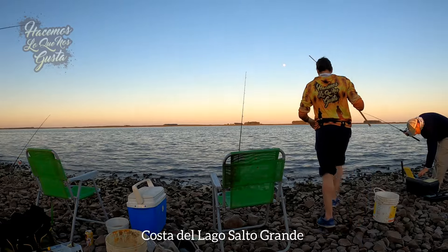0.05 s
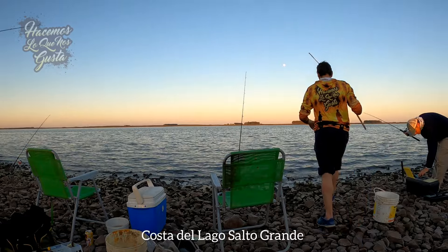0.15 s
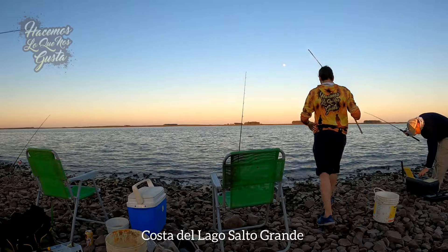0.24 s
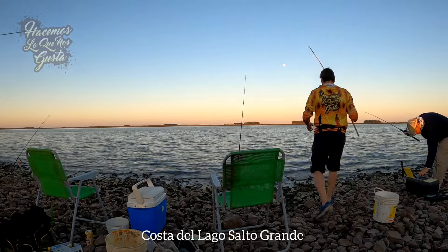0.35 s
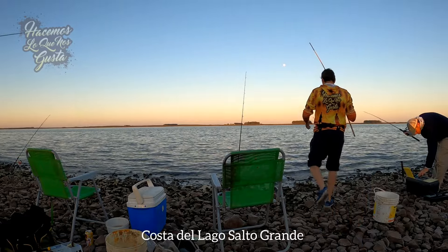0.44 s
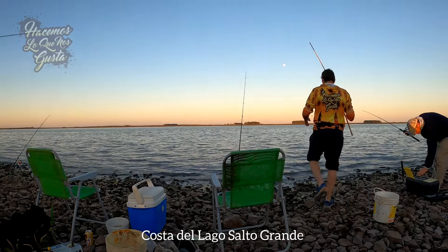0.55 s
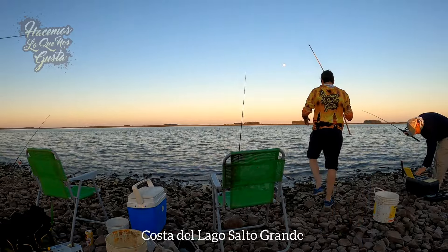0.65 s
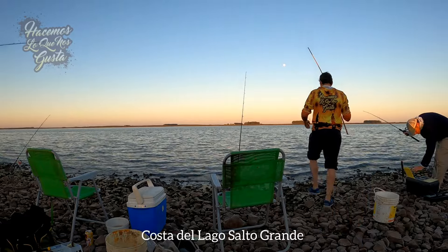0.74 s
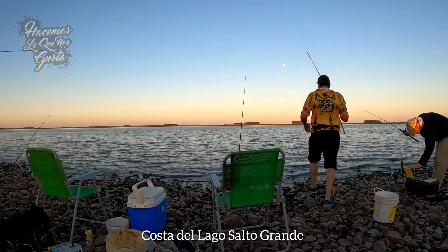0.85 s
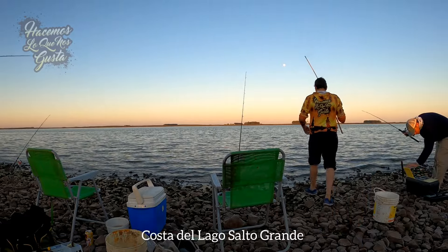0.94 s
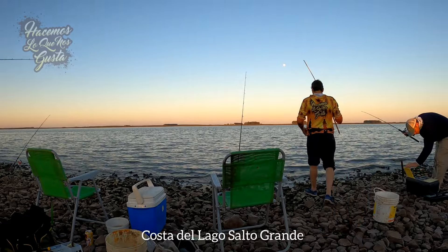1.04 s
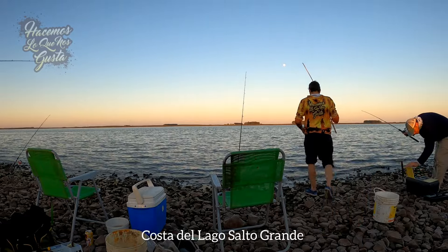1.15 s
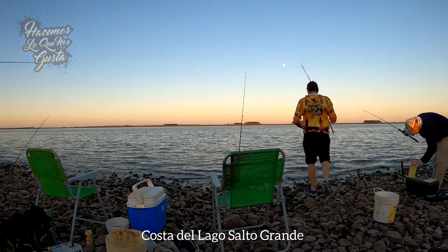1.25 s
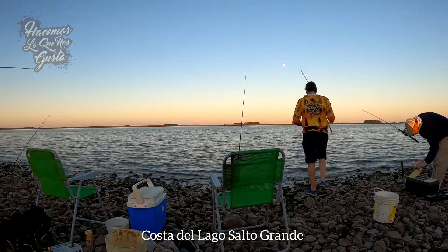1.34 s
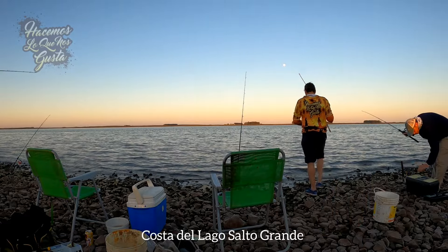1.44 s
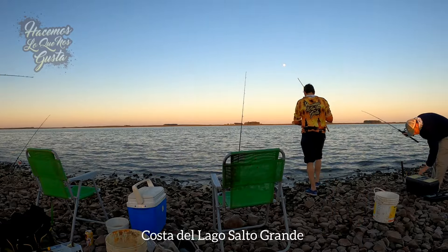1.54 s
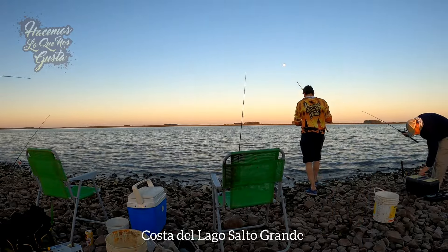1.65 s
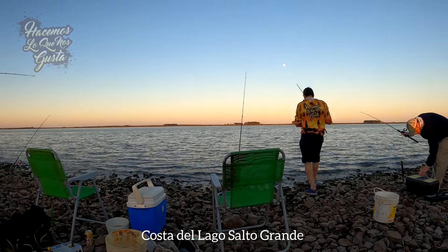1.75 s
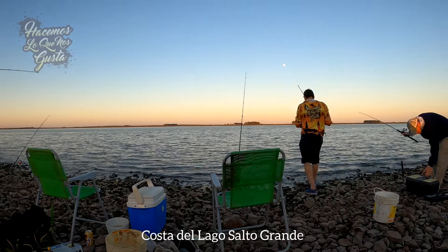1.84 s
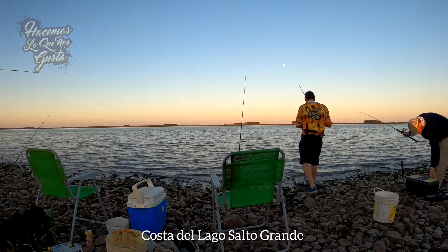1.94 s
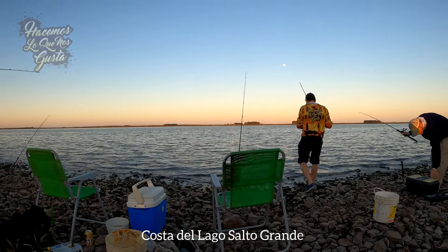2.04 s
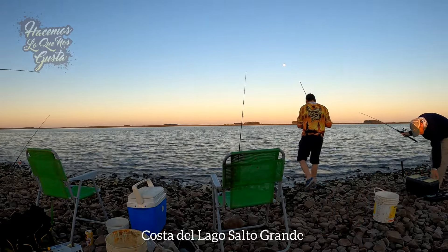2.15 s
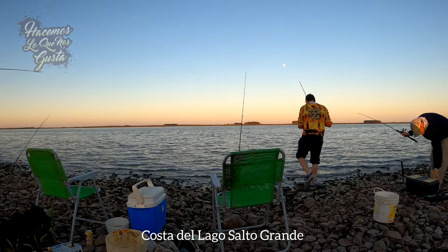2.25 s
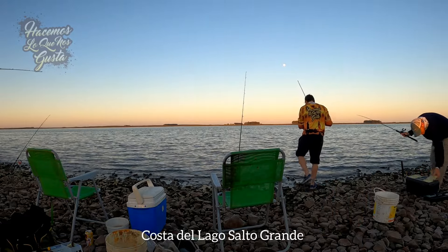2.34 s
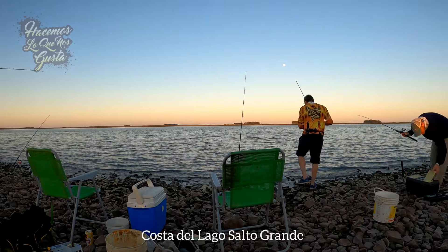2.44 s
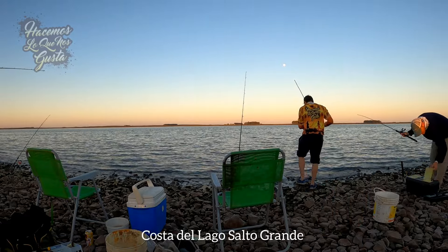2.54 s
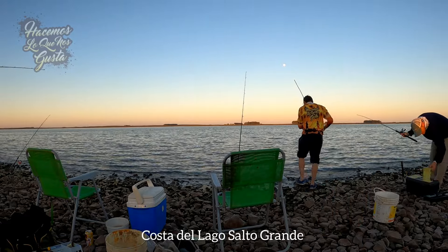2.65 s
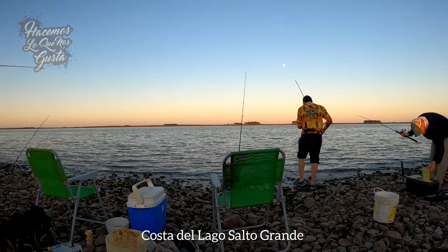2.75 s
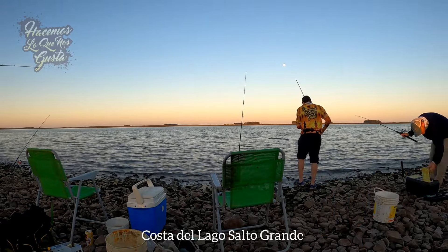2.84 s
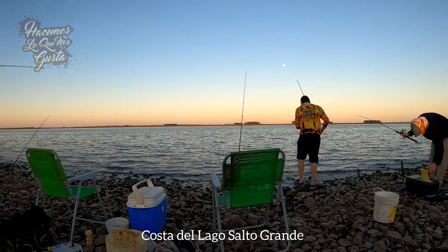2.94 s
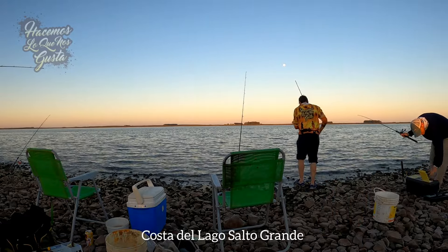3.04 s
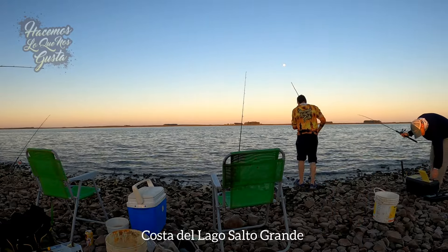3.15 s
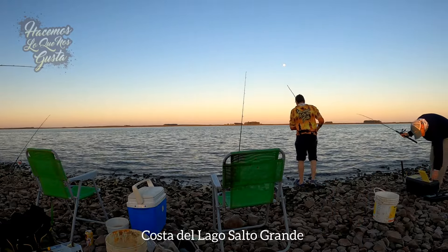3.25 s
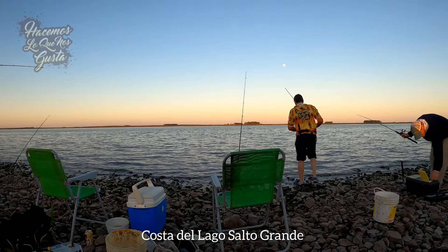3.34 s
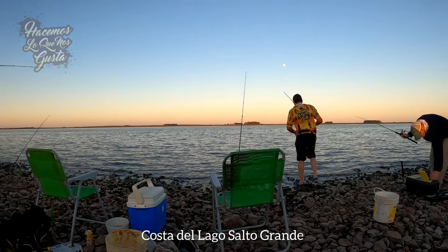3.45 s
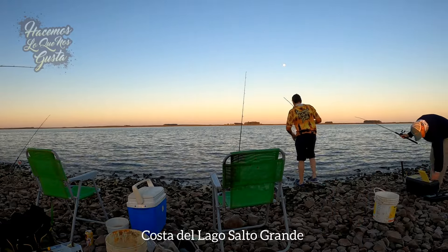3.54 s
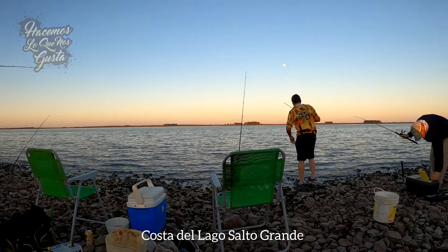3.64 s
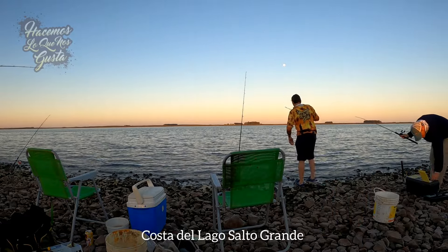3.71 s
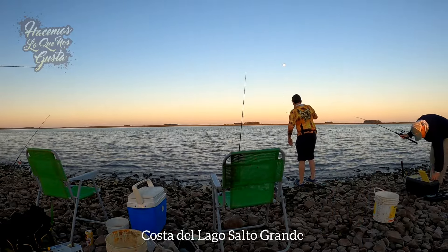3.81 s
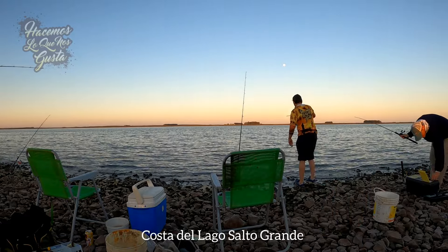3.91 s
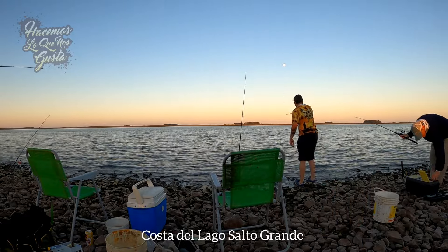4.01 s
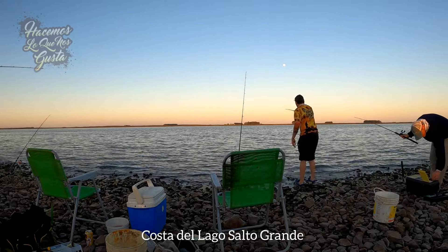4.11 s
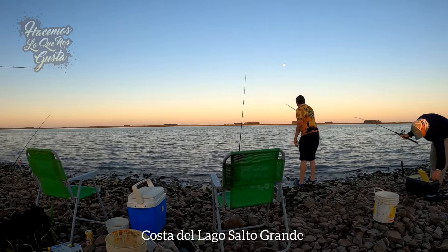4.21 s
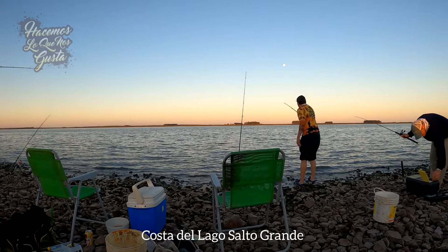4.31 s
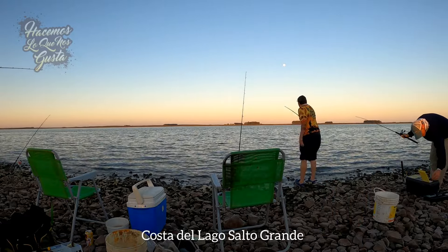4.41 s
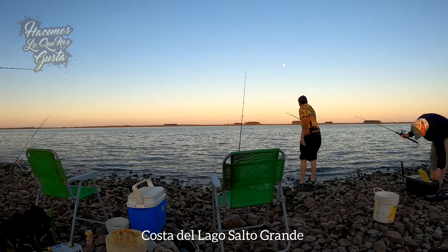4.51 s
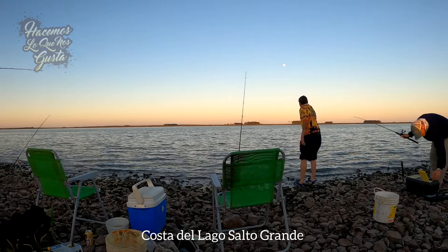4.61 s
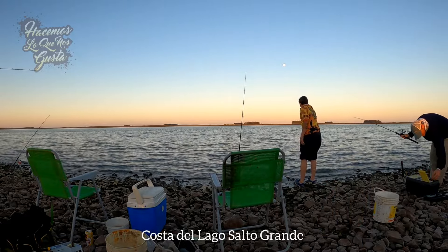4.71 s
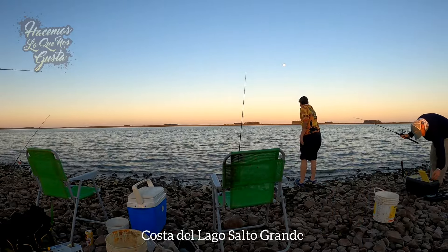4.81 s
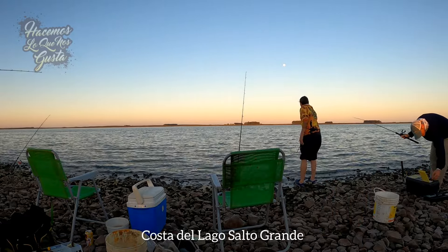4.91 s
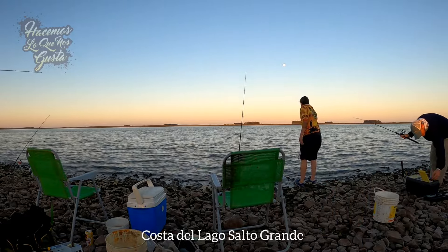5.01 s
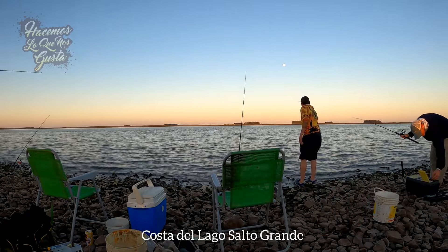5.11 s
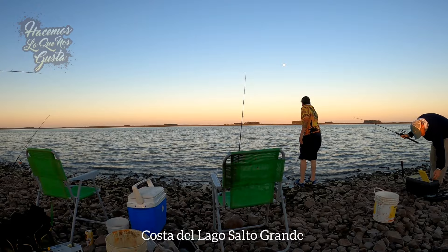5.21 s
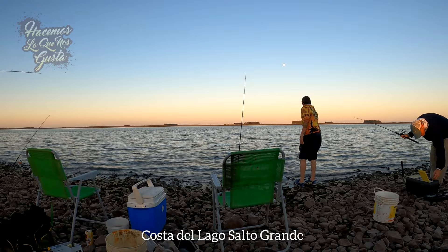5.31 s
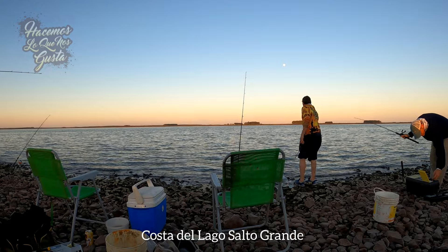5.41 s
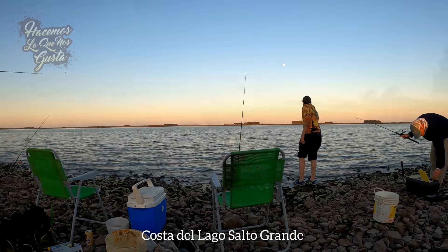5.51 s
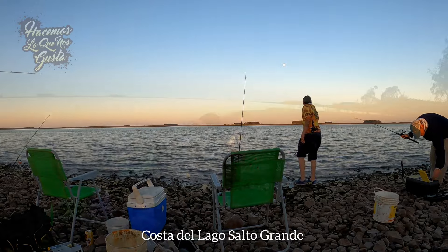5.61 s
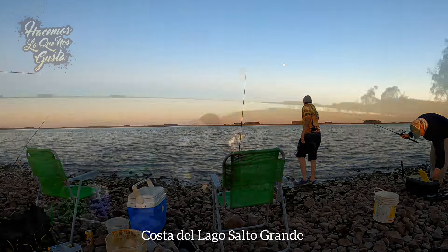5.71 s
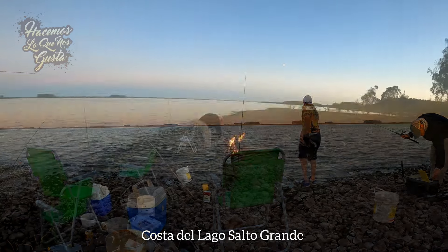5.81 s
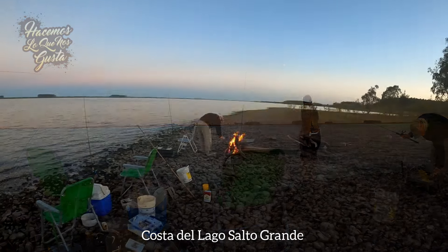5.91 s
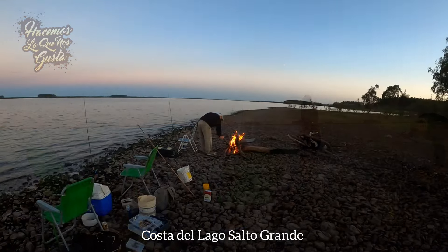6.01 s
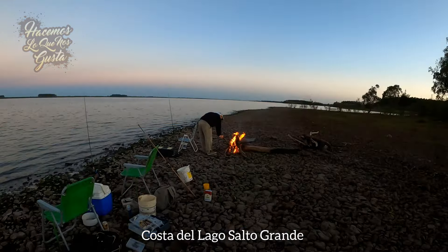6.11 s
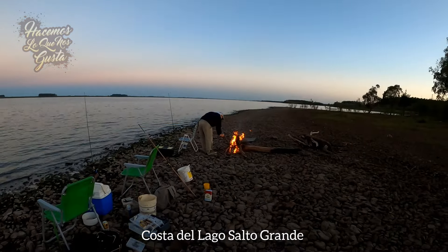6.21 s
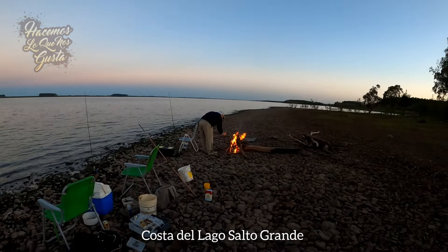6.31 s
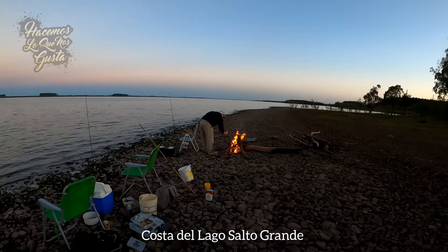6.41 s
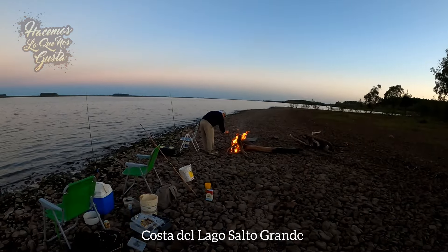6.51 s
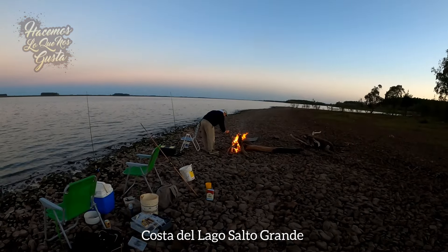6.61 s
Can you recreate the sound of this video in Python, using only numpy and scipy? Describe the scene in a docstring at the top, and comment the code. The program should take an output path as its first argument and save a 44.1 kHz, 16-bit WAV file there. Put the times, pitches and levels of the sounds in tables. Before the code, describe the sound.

Small waves lap and fizz over a pebbly lakeshore as wind rumbles, stones knock underfoot, and a crackling campfire rises at the end.

```python
"""Small waves lap a pebbly shore throughout: bubbles and hiss swell and drain, with drops, gulps and clicks.
A far bird whistles at once and again at 5.5 s, both gliding sines; early gusts rumble on two microphone ports.
A faint drone wavers from the start and sinks away by about 4 s. Rocking stones ring their modes from 0.3 s and
footfalls thud underfoot from 1.5 s; pops kick the ports at 1.2 and 2.5 s. From 5.4 s a campfire of noise and
ticks grows, with ringing firewood knocks, snaps and a last swell of sparks, just rising as the sound ends."""
import sys
import numpy as np
from scipy import signal
from scipy.fft import rfft, irfft, next_fast_len
from scipy.io import wavfile
from scipy.ndimage import uniform_filter1d, map_coordinates

SR = 44100
rng = np.random.default_rng(int(sys.argv[2]) if len(sys.argv) > 2 else 0)


def store_pcm(level_fs):
    """Save levels as 16-bit WAV."""
    pcm = np.round(np.clip(level_fs, -1, 1) * 32767).astype(np.int16)
    wavfile.write(sys.argv[1], SR, np.atleast_2d(pcm).T)


N = 293706
TIME = np.arange(N) / SR
RING = np.arange(SR // 4) / SR  # time axis of one short event, s

# In spectra, level/dB is the relative density per Hz.
# far background air: f/Hz, level/dB
AIR_SPECTRUM = [(25, 3), (120, -9), (210, -8), (300, -15), (600, -15), (3000, -21), (7000, -36),
                (12000, -55)]
# faint far drone: t/s, level/dB
DRONE_LEVEL = [(2.1, -68), (2.6, -73), (3.4, -69.5), (3.85, -70.5), (4.1, -82)]
# far bird, one table per whistle: t/s, f/Hz, level/dB
BIRD_WHISTLES = [
    [(0, 4830, -53), (.06, 4850, -51), (.095, 4910, -57), (.12, 5060, -61)],
    [(5.5, 2850, -64), (5.535, 3060, -55.5), (5.57, 2950, -59), (5.6, 2780, -61)],
]

# bed of flames, crackle and embers: t/s, level/dB
FIRE_LEVEL = [(5.4, -100), (5.65, -60), (6.1, -50), (6.66, -47.5)]
# flames and hiss: f/Hz, level/dB
FLAME_SPECTRUM = [(30, 9), (90, 28), (170, 25), (290, 9.5), (450, 4), (900, -30), (4000, -9), (5100, 3),
                  (5750, 2), (6400, -10), (9000, -17), (13000, -18), (15500, -38)]
# colour of the finest ticks: f/Hz, level/dB
SPARK_SPECTRUM = [(500, -20), (1800, -2), (5500, 0), (8000, -8), (10000, -22), (13000, -22), (15500, -38)]
# bursts of burning wood: t/s, level/dB, f/Hz, t60/s
FIRE_SNAPS = [(5.7837, -42, 4500, 0.03), (6.056, -41, 4230, 0.019), (6.1158, -34, 3000, 0.023),
              (6.2532, -33.5, 2250, 0.025), (6.3173, -36.5, 5470, 0.0073), (6.3647, -34, 7600, 0.0083),
              (6.409, -36, 5300, 0.031), (6.499, -30, 5070, 0.01), (6.538, -39, 5420, 0.049),
              (6.5913, -35, 5400, 0.011), (6.395, -39.5, 1000, .015)]
# last swell of sparks, just rising as the sound ends: t/s, swell width/s, level/dB
SPARK_FLARE = (6.7, 0.043, -47.5)
EMBERS_DB = -21  # ember ticks against the flames
# firewood knocks: t/s, level/dB, pitch ratio, brightness/(dB per octave), rattle/s, left-right/dB
LOG_KNOCKS = [(5.656, -32, 0.81, 5, 0.021, 3.5), (5.878, -42, 0.91, -16, 0.0072, 0),
              (5.8995, -31.5, 0.99, -12, 0.014, 4.5), (6.10, -41.5, 0.96, 8, 0.027, -1),
              (6.145, -35.5, 0.99, -20, 0.01, 2), (6.175, -41.5, 1, -16, 0.011, 4)]
# ring of a log, before the pitch ratio: f/Hz, level/dB, t60/s
LOG_RING = [(438, -6.5, 0.16), (563, 10, 0.097), (690, -12, 0.1), (1300, -6, 0.042)]

# gusts on the ports: t/s, relative level/dB, swell width/s, left-right/dB
WIND_GUSTS = [(0.247, -28, 0.14, -3), (0.47, -31.5, 0.2, -9.5), (0.886, -44, 0.39, 9),
              (0.993, -32.5, 0.13, 2.5), (1.433, -36.5, 0.052, 1.5), (1.608, -35, 0.14, 23),
              (1.803, -37.5, 0.12, -10), (2.133, -32.5, 0.15, 8.5), (2.404, -39.5, 0.08, 3),
              (2.653, -49, 0.34, -2.5), (2.935, -44, 0.12, 0), (3.644, -45, 0.26, -2),
              (3.812, -48.5, 0.38, -3), (4.098, -47.5, 0.18, 7), (4.606, -36.5, 0.29, -3.5),
              (5.535, -44, 0.14, 3), (6.335, -56, 1, -4)]
# large slow eddies: f/Hz, level/dB
RUMBLE_SPECTRUM = [(12, 1.5), (28, 7.5), (60, 7), (110, -6), (180, -34), (300, -33.5), (600, -87)]
# small fast eddies: f/Hz, level/dB
FLUTTER_SPECTRUM = [(60, -8), (120, 13), (190, 8.5), (300, -11.5), (500, -22), (1200, -82)]
# strong eddies, timed at their middle: t/s, level/dB, f/Hz, left-right/dB
EDDY_THUMPS = [(0.164, -21.5, 82, -18), (0.206, -25.5, 124, -18), (0.235, -27, 85, -18),
               (0.252, -15.5, 54, 27), (0.308, -26, 62.3, 9), (0.418, -18, 124, -35),
               (0.461, -23.5, 118, -39), (0.532, -25.5, 135, -24), (0.561, -25.5, 148, -35),
               (0.791, -21, 62.5, 23), (1.006, -14, 119, -35), (1.029, -15, 98, -30), (2.105, -19, 51, -35),
               (2.179, -30.5, 80.4, 33), (4.439, -28, 62, -32), (4.519, -25.5, 55.5, -8),
               (4.599, -20.5, 75, -28.5), (4.648, -26.5, 62.4, 12), (4.679, -24.5, 56, 22)]
BREEZE_DB = -72  # wind strength between gusts, on the scale of the gusts
# sharp pops at the microphone: t/s, level/dB, left-right/dB
MIC_POPS = [(1.208, -11.5, 4.5), (1.2205, -22, 0), (2.544, -16, 4.5)]
# swings after a pop, left port then right: f/Hz, level/dB, t60/s
POP_SWINGS = [
    [(38, -13, 0.036), (114, -8.5, 0.016), (570, -14.5, 0.0064), (2870, 7, 0.00021)],
    [(75, -5, 0.022), (206, -1.5, 0.011), (970, 2.5, 0.0021), (3170, -42, 0.00011)],
]

# big stones rocking: t/s, level/dB, pitch ratio, brightness/(dB per octave), rattle/s, left-right/dB
STONE_KNOCKS = [(.3348, -24, 1.15, -2.5, 0.0016, -0.5), (1.5035, -20, 1.045, 1.6, 0.0079, -1.5),
                (1.6636, -19.5, 1.01, -2.5, 0.0048, -2), (1.682, -33, 0.79, -12, 0.025, 0),
                (1.838, -38.5, 1.11, -0.5, 0.069, -4), (2.18, -33.5, 1.12, -11, 0.0065, -8),
                (2.38, -32, 1.1, 0, 0.012, -2), (2.389, -27.5, 1.02, 0.5, 0.0055, -2),
                (5.05, -37.5, 1.22, 0, 0.02, -3)]
# ring of a stone, before the pitch ratio: f/Hz, level/dB, t60/s
STONE_RING = [(223, -12.5, 0.14), (424, -1.5, 0.068), (664, -5, 0.082), (995, 2.5, 0.056), (1350, 6, 0.011),
              (1760, -1.5, 0.032), (3240, -28, 0.009), (5570, -1, 0.0047)]
# scraping under a knock: f/Hz, level/dB
GRIT_SPECTRUM = [(100, 5.5), (400, 1.5), (1000, 1), (2000, -1.5), (3500, -10), (6500, -7.5), (10000, -34.5),
                 (15000, -62)]
# weight settling into the pebble bed: t/s, level/dB, t60/s
STEP_THUDS = [(1.506, -31, 0.16), (1.677, -38, 0.9), (1.832, -31.5, 0.48), (2.382, -24.5, 0.12)]
# thud of the pebble bed: f/Hz, level/dB
GROUND_SPECTRUM = [(60, -36), (130, -4), (180, 2), (290, -14), (420, -25.5), (900, -60)]
# fine gravel crunching as a foot shifts: t/s, swell width/s, level/dB
GRAVEL_CRUNCHES = [(.551, 0.0058, -45), (3.51, 0.0087, -46), (3.55, .012, -48)]
# clear pebble clicks, before a shared trim: t/s, level/dB, ring f/Hz, left-right/dB
PEBBLE_CLICKS = [(0.1896, -39.5, 2950, -1), (0.467, -42, 4160, -20), (0.544, -36.5, 2430, -7),
                 (0.9583, -33, 3090, 3.5), (1.1555, -37, 3480, 2), (1.5343, -47, 2650, 7),
                 (3.022, -42.5, 3550, -6), (3.110, -41, 4500, -2), (3.4973, -33, 2560, -6),
                 (3.857, -41, 2250, -3), (4.109, -46, 4370, 7), (4.455, -40.5, 2210, 12),
                 (4.583, -40, 2270, 4), (5.114, -36, 2940, 4)]

# wavelets at the shore: crest t/s, level/dB, rise/s, drain/s, slosh over splash/dB
SHORE_WAVES = [(0.029, -54.5, .3, 0.23, -2), (.38, -52, 0.31, 1, -10), (1.06, -52, 0.26, 0.37, 2),
               (1.25, -50.5, 0.11, 0.31, 1), (2.08, -47.5, 0.32, 0.37, -0.5), (2.42, -55, 0.073, 0.2, 3.5),
               (3.02, -51, 0.15, 0.98, -4.5), (3.56, -52.5, 0.1, 0.2, 1.5), (3.978, -63, 0.038, 0.79, 2.5),
               (4.69, -62.5, 0.087, 0.035, 8), (5.08, -49.5, 0.35, 0.4, -5),
               (5.85, -56.5, 0.53, 0.63, -1.5)]
# slosh, splash, fizz: level between wavelets/dB, share of a wavelet/dB, lag/s, drain time ratio
SURF_SIZES = [(-98, -3, 0.001, 0.74), (-73.5, -2.5, 0.049, 0.85), (-65.5, -4, -0.024, 1.14)]
# colour of the water: f/Hz, level/dB
WATER_SPECTRUM = [(160, -31), (280, 12), (315, -0.5), (419, 1), (471, -7), (671, -3), (938, -7.5),
                  (1130, -4.5), (3040, -0.5), (5200, 0.5), (9700, -15.5), (12000, -21), (15500, -32)]
# left-right likeness of the water: f/Hz, correlation
WATER_LIKENESS = [(300, 0.82), (700, 0.9), (1500, 0.75), (3000, 0.84), (6000, 0.041), (12000, 0.71)]
# tiny bubbles of water seeping back between the pebbles: t/s, level/dB
TRICKLE_LEVEL = [(0, -75), (1.2, -71), (2.6, -64), (3.6, -61.5), (4.15, -57), (4.7, -66), (6.66, -64.5)]
# single loud bubbles: t/s, level/dB, starting f/Hz
LOUD_BUBBLES = [(0.266, -40.5, 2940), (.351, -39, 1230), (0.801, -43, 2310), (1.007, -41.5, 2480),
                (1.035, -41.5, 970), (1.066, -42.5, 1930), (1.169, -35, 2880), (1.236, -39, 4500),
                (1.651, -39.5, 2870), (1.936, -27.5, 3950), (1.965, -40.5, 624), (2.065, -36, 4100),
                (3.048, -40, 1830), (3.243, -38.5, 3400), (3.405, -47, 1410), (3.475, -44, 1430),
                (3.618, -34, 5600), (3.947, -43, 7500), (4.112, -44.5, 1600), (4.169, -37.5, 4220),
                (4.239, -38, 3960), (4.838, -36, 4530), (4.894, -40.5, 1350), (5.039, -38, 930),
                (5.189, -41.5, 2270), (5.288, -39.5, 3430), (5.37, -43, 1440), (6.513, -43, 2480)]
# water gulping into gaps: t/s, level/dB, starting f/Hz, filling time/s, climb/octaves
STONE_GULPS = [(1.055, -51, 524, 0.043, 0.7), (1.465, -46, 1150, 0.021, 0.69), (2.878, -50, 690, 0.03, .65),
               (2.925, -47, 706, 0.026, 1.5), (2.958, -46, 380, 0.044, 0.8),
               (3.665, -50.5, 610, 0.061, 0.54), (4.65, -48, 484, 0.036, 0.29),
               (5.427, -45.5, 550, 0.058, 1.37)]
# loud bubbles all last this many cycles; their climb setting is the second number over their pitch
BUBBLE_CYCLES, BUBBLE_CLIMB_HZ = 39, 278
SPRAY_DB = -8  # spray ticks on dry stone, against the fizz at its highest crest
MERGE = .25  # how far bubbles blend into hiss as a wavelet swells

# phase lag of the left port behind the right, negative where it leads: f/Hz, lag/rad
SHORE_LAG = [(100, -9.5), (260, 0.27), (780, 0.12), (2000, 0.68), (4310, 1.32), (5860, 4), (7000, 4)]
SHORE_BALANCE = [(1300, -2.5), (2600, -.2)]  # f/Hz, left-right/dB
# treble response of the left port: f/Hz, level/dB
LEFT_RESPONSE = [(6300, -0.5), (7100, -10.5), (8100, -31), (9500, -4), (12000, -9.5), (13500, -12)]
TOP_HZ = 15720


def amp(db):
    """Decibels to gain."""
    return 10 ** (np.asarray(db) / 20)


def unit(x):
    """Scale to rms 1."""
    return x / np.sqrt(np.mean(x ** 2) + 1e-20)


def along(points, hz):
    """Read (Hz, value) points on a log frequency axis."""
    f, v = np.transpose(points)
    return np.interp(np.log(hz + 1), np.log(f + 1), v)


def curves(rows):
    """One value per sample for each column after the time."""
    s, *cols = np.transpose(rows)
    return [np.interp(TIME, s, c) for c in cols]


def wobble(rate):
    """A smooth random curve with this many knots a second."""
    return map_coordinates(rng.standard_normal(int(N * rate / SR) + 4), [TIME * rate])


def filtered(x, response):
    """Multiply the spectrum of x by a response of frequency."""
    size = next_fast_len(N + SR // 4)
    return irfft(rfft(x, size) * response(np.fft.rfftfreq(size, 1 / SR)), size)[..., :N]


def noise(spectrum):
    """Coloured noise of rms 1, unrelated in the two channels."""
    return unit(filtered(rng.standard_normal((2, N)), lambda hz: amp(along(spectrum, hz))))


def fade(t, t60):
    """Exponential decay by 60 dB in t60 seconds."""
    return np.exp(-np.log(1000) * t / t60)


def sides(pan_db):
    """Left and right gains of mean power 1."""
    gains = amp(np.array([pan_db, -pan_db]).reshape(2, -1) / 2)
    return gains / np.sqrt(np.mean(gains ** 2, axis=0))


def add(out, s, sound, db, pan_db):
    """Place a sound at a time, peak level and side."""
    part = out[:, max(round(s * SR), 0):][:, :len(sound)]
    placed = amp(db) * sides(pan_db) * sound / np.abs(sound).max()
    part += placed[:, :part.shape[1]]


def bubble(t, hz, t60, rise):
    """A bubble rings and climbs in pitch as it nears the surface."""
    phase = hz * (t + np.log(2) * rise * t * t / (2 * t60))
    onset = 1 - np.exp(-t * hz / 2)
    return np.sin(2 * np.pi * phase) * fade(t, t60) * onset


def froth(low_hz, high_hz, cycles, rise, spread_db, width_db, count):
    """A stereo cloud of rms 1 of random bubbles; small ones die sooner."""
    when, size, loud, life, side = rng.random((count, 5)).T[:, :, None]
    hz = low_hz * (high_hz / low_hz) ** size
    t60 = cycles / hz * 2 ** (2 * life - 1)
    k = np.arange(min(int(np.median(t60) * 2 * SR), SR // 8))
    loudness = amp(-spread_db * np.log(.02 + .98 * loud))  # few strong, many faint
    grains = loudness * bubble(k / SR, hz, t60, rise)
    at = ((when * N).astype(int) + k).ravel()
    gains = sides(width_db * (2 * side[:, 0] - 1))
    return unit(np.array([np.bincount(at, (grains * g[:, None]).ravel(), N)[:N] for g in gains]))


def sparks(count):
    """Stereo ticks of rms 1, too short to ring: many faint, a few strong."""
    when, loud, side = rng.random((count, 3)).T
    size = (.025 + loud) ** -.8
    at = (when * N).astype(int)
    ticks = np.array([np.bincount(at, size * g, N) for g in sides(8 * (2 * side - 1))])
    return unit(filtered(ticks, lambda hz: amp(along(SPARK_SPECTRUM, hz))))


def flurry(s, width, db):
    """A brief swell of dense ticks."""
    swell = amp(db) / (1 + ((TIME - s) / width) ** 2) ** 2
    return swell * sparks(count=22000)


def snap(hz, t60, crack_db):
    """A tiny hard contact: a ring and a broadband crack."""
    ring = np.sin(2 * np.pi * hz * RING) * fade(RING, t60)
    band = signal.butter(4, [1100, 6400], "band", fs=SR)
    crack = signal.lfilter(*band, rng.standard_normal(len(RING)))
    return ring + amp(crack_db) * crack * fade(RING, 1.5 * t60)


def air():
    """Steady coloured noise makes the distant background."""
    return amp(-65.5) * noise(AIR_SPECTRUM)


def drone(hz):
    """A faint hum that wavers and fades, perhaps a motor far across the lake."""
    pitch = hz + 8 * wobble(70)
    hum = unit(np.sin(2 * np.pi * np.cumsum(pitch) / SR))
    return amp(curves(DRONE_LEVEL)[0] + 3.5 * wobble(16)) * hum


def bird():
    """Thin gliding whistles from far off: sines with quavering pitch and level."""
    out = np.zeros(N)
    for rows in BIRD_WHISTLES:
        hz, db = curves(rows)
        sounding = (TIME >= rows[0][0]) & (TIME < rows[-1][0])
        gate = uniform_filter1d(1. * sounding, size=400)  # soft edges
        pitch = hz + 28 * wobble(250)
        level = amp(db + 2.6 * wobble(90))
        out += gate * level * np.sin(2 * np.pi * np.cumsum(pitch) / SR)
    return out


def snaps():
    """Burning wood bursts: a sharp tick with a short ringing spit of gas."""
    out = np.zeros((2, N))
    for s, db, hz, t60 in FIRE_SNAPS:
        tick = np.cos(2 * np.pi * hz * RING) * fade(RING, .0005)
        add(out, s, 1.26 * tick + snap(hz, t60, crack_db=1.0), db, pan_db=4.5)
    return out


def fire():
    """Flames flutter and damp wood hisses, with crackles, ember ticks, snaps and a last swell of sparks."""
    crackle = froth(1700, 6800, cycles=9, rise=0, spread_db=4.5, width_db=4, count=2800)
    flames = noise(FLAME_SPECTRUM) * amp(1.8 * wobble(14))
    embers = amp(EMBERS_DB) * sparks(count=3500)
    burning = amp(curves(FIRE_LEVEL)[0]) * (flames + amp(-12) * crackle + embers)
    return burning + snaps() + flurry(*SPARK_FLARE)


def knocks(rows, modes, chatter_db, grit_db, tail_db):
    """A blow and a quick rattle of smaller contacts ring an object's modes, while grit scrapes and settles."""
    out = np.zeros((2, N))
    grit = noise(GRIT_SPECTRUM)[0] * amp(4 * wobble(500))
    size = len(RING)
    octaves = np.log2(1 + np.fft.rfftfreq(size, 1 / SR) / modes[0][0])
    lead = 64  # samples of room ahead of the blow for the brightness filter
    for s, db, ratio, tilt_db, rattle, pan_db in rows:
        ring = np.zeros(size)
        for k, (hz, level, t60) in enumerate(modes):
            strength = amp(level + rng.normal(0, 1)) * (-1) ** k
            ring += strength * fade(RING, t60) * np.sin(2 * np.pi * hz * ratio * RING)
        dying = np.exp(-RING / rattle)
        sparse = rng.standard_normal(size) * (rng.random(size) < .012)
        contacts = amp(chatter_db) * sparse * dying
        contacts[0] = 1.1  # the blow itself
        settling = amp(tail_db) * fade(RING, 0.095)
        scrape = grit[int(s * SR):][:size] * (dying + settling) * (1 - np.exp(-RING / 0.00026))
        hit = unit(signal.fftconvolve(contacts, ring)[:size]) + amp(grit_db) * unit(scrape)
        # a softer contact gives a duller knock
        hit = irfft(rfft(np.pad(hit, (lead, 0)), size) * amp(tilt_db * octaves), size)
        add(out, s - lead / SR, hit, db, pan_db)
    return out


def footfalls():
    """Each step presses a dull thud out of the pebble bed."""
    out = np.zeros((2, N))
    bed = noise(GROUND_SPECTRUM)[0]
    for s, db, t60 in STEP_THUDS:
        envelope = fade(RING, t60) * (1 - np.exp(-RING / 0.0017))
        add(out, s, bed[int(s * SR):][:len(RING)] * envelope, db, pan_db=-3.0)
    return out


def gusts():
    """Wind strength at each port: every gust swells and dies alike, over a light breeze."""
    power = amp(BREEZE_DB) ** 2
    for s, db, width, pan_db in WIND_GUSTS:
        swell = 1 / (1 + ((TIME - s) / width) ** 2) ** 3
        power = power + (amp(db) * sides(pan_db) * swell) ** 2
    return np.sqrt(power)


def wind():
    """Turbulence rumbles on each port, harder gusts flutter more; separately timed push-pull thumps strike too."""
    strength = gusts()
    lumps = amp(4.2 * np.array([wobble(22), wobble(22)]))
    rumble = amp(5.0) * strength * unit(lumps * noise(RUMBLE_SPECTRUM))
    # flutter grows faster than rumble as the wind hardens
    flutter = amp(3) * strength ** 1.38 * unit(lumps * noise(FLUTTER_SPECTRUM))
    out = rumble + flutter
    middle = RING[-1] / 2
    for s, db, hz, side_db in EDDY_THUMPS:
        u = np.pi * hz * (RING - middle)
        thump = -np.sin(2 * u) / (1 + (u / 1.076) ** 2) ** 2
        add(out, s - middle, thump, db, side_db)
    return out


def pops():
    """A sudden pressure kick at the microphone: a spike, then slower and slower swings, slowest at the left port."""
    out = np.zeros((2, N))
    for port, body in enumerate(POP_SWINGS):
        kick = np.zeros(len(RING))
        for k, (hz, db, t60) in enumerate(body):
            kick += (-1) ** k * amp(db) * np.sin(2 * np.pi * hz * RING) * fade(RING, t60)
        kick = signal.lfilter(*signal.butter(6, 6700, fs=SR), kick)
        pair = np.zeros((2, N))
        for s, db, pan_db in MIC_POPS:
            add(pair, s, kick, db, pan_db)
        out[port] = pair[port]
    return out


def surf():
    """Levels of slosh, splash and fizz: each wavelet swells to its crest, then drains away."""
    levels = []
    for size, (calm_db, share_db, lag, linger) in enumerate(SURF_SIZES):
        power = amp(calm_db) ** 2
        for s, db, rise, drain, slosh_db in SHORE_WAVES:
            t = TIME - s - lag
            shape = np.exp(-np.where(t < 0, (t / rise) ** 2, t / (drain * linger)))
            extra_db = slosh_db if size == 0 else 0
            power = power + (amp(db + share_db + extra_db) * shape) ** 2
        levels.append(np.sqrt(power))
    return levels


def clicks():
    """Clear pebble clicks, and many faint ones from pebbles that the splashing water rolls."""
    out = np.zeros((2, N))
    for s, db, hz, pan_db in PEBBLE_CLICKS:
        add(out, s + 0.001257, snap(hz, t60=0.021, crack_db=2), db + 4.5, pan_db)
    # the faint ones follow the level of the fizz
    fizz_db = 20 * np.log10(surf()[2])
    for when, loud, pitch, side in rng.random(size=(170, 4)):
        at = int(when * N)
        tick = snap(2200 + 3800 * pitch, t60=.006, crack_db=6)
        add(out, at / SR, tick, fizz_db[at] + 8 + 7 * loud ** 2, 5 * (2 * side - 1))
    return out


def wash(patchy_db):
    """Patchy stereo noise of rms 1: the blended sound of the whole shoreline."""
    z = signal.stft(rng.standard_normal((2, N)), nperseg=512)[2]
    field = rng.standard_normal(z.shape[1:])
    field = uniform_filter1d(uniform_filter1d(field, size=5, axis=0), size=6, axis=1)
    pair = signal.istft(z * amp(patchy_db * unit(field)), nperseg=512)[1][:, :N]
    # mix mid and side so that the ports are as alike as the table asks
    turn = lambda hz: np.arccos(np.clip(along(WATER_LIKENESS, hz), -1, 1)) / 2
    mid, side = filtered(pair, lambda hz: np.array([np.cos(turn(hz)), np.sin(turn(hz))]))
    return unit(np.array([mid + side, mid - side]))


def gulp(hz, length, octaves):
    """A pocket of air shrinks as water fills it, so its ring climbs unsteadily."""
    u = np.minimum(RING / length, 1)
    pitch = hz * 2 ** (octaves * u ** 1.3 + .085 * wobble(400)[:len(u)])
    envelope = np.sqrt(u) * (1 - u) ** .6 * amp(3.5 * wobble(150)[:len(u)])
    return envelope * np.sin(2 * np.pi * np.cumsum(pitch) / SR)


def waves():
    """Each wavelet sloshes with big bubbles, splashes with small ones and drains through the pebbles as fizz."""
    slosh, splash, fizz = surf()
    shore = wash(patchy_db=2.1)
    colour = lambda hz: amp(along(WATER_SPECTRUM, hz))

    def layer(level, low_hz, high_hz, cycles, rise, grain_db, count):
        """Bubbles of one size class over their share of the wash."""
        band = lambda hz: np.sqrt(1 / (1 + (hz / high_hz) ** 10) / (1 + (low_hz / (hz + 1)) ** 10))
        grains = froth(low_hz, min(high_hz, 10000), cycles, rise, spread_db=3.7, width_db=5, count=count)
        grains = unit(filtered(grains / level ** MERGE, colour))
        hiss = unit(filtered(shore, lambda hz: band(hz) * colour(hz)))
        spurts = amp(1.3 * wobble(40))
        return level * unit(spurts * (hiss + amp(grain_db) * grains))

    big = layer(slosh, 440, 900, cycles=28, rise=.7, grain_db=2.5, count=850)
    small = layer(splash, 900, 2500, cycles=32, rise=.42, grain_db=3, count=3200)
    tiny = layer(fizz, 2500, 16000, cycles=26, rise=.15, grain_db=2, count=6000)
    # drops that strike wet stone tick with hardly any ring
    drops = froth(1500, 9000, cycles=8, rise=0, spread_db=5, width_db=5, count=1700)
    patter = amp(-2.5) * unit(filtered(drops, colour))
    spray = amp(SPRAY_DB) * fizz / fizz.max() * sparks(count=1400)
    ripple = amp(.8 * wobble(11))
    out = ripple * (big + small + tiny + fizz * (patter + spray))
    seeping = froth(4700, 6800, cycles=22, rise=.1, spread_db=4, width_db=6, count=2600)
    out = out + amp(curves(TRICKLE_LEVEL)[0]) * seeping
    for s, db, hz in LOUD_BUBBLES:
        add(out, s, bubble(RING, hz, BUBBLE_CYCLES / hz, BUBBLE_CLIMB_HZ / hz), db, pan_db=-0.5)
    for s, db, hz, length, octaves in STONE_GULPS:
        add(out, s, gulp(hz, length, octaves), db, pan_db=0.0)
    return out


def scene():
    """The shore lies a little to the right, so its sound reaches the left port late."""
    stones = knocks(STONE_KNOCKS, STONE_RING, chatter_db=-0.5, grit_db=0, tail_db=2.0)
    logs = knocks(LOG_KNOCKS, LOG_RING, chatter_db=-9, grit_db=-17, tail_db=-6)
    crunching = sum(flurry(*crunch) for crunch in GRAVEL_CRUNCHES)
    shore = waves() + clicks() + bird() + stones + footfalls() + logs + crunching
    lag = lambda hz: np.exp(np.outer([-.5j, .5j], along(SHORE_LAG, hz)))
    shore = filtered(shore, lambda hz: lag(hz) * sides(along(SHORE_BALANCE, hz)))
    return shore + fire() + wind() + pops() + drone(hz=199.3) + air()


def record(dry):
    """The left port is duller in the treble; nothing passes the band limit."""
    left = filtered(dry[0], lambda hz: amp(along(LEFT_RESPONSE, hz)))
    return filtered(np.array([left, dry[1]]), lambda hz: hz < TOP_HZ)


dry = scene()
out = record(dry)
store_pcm(out)
```